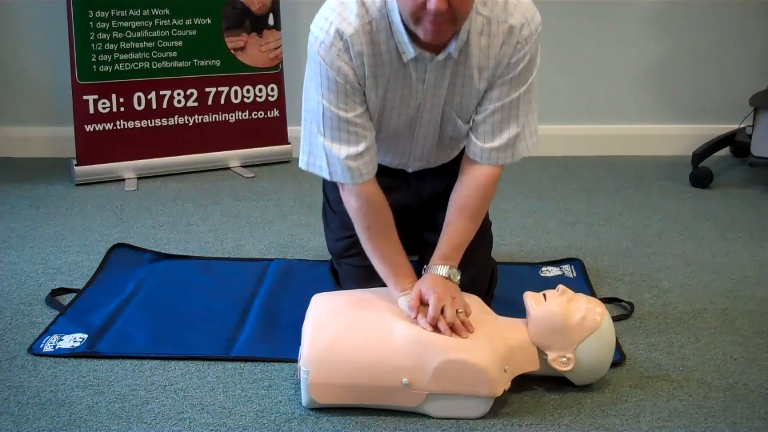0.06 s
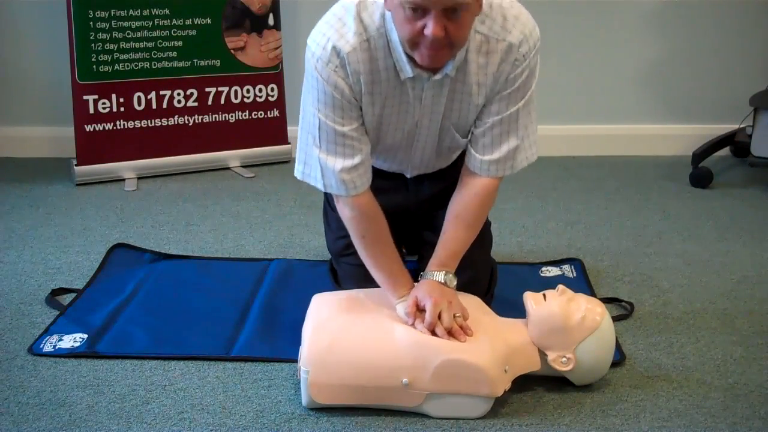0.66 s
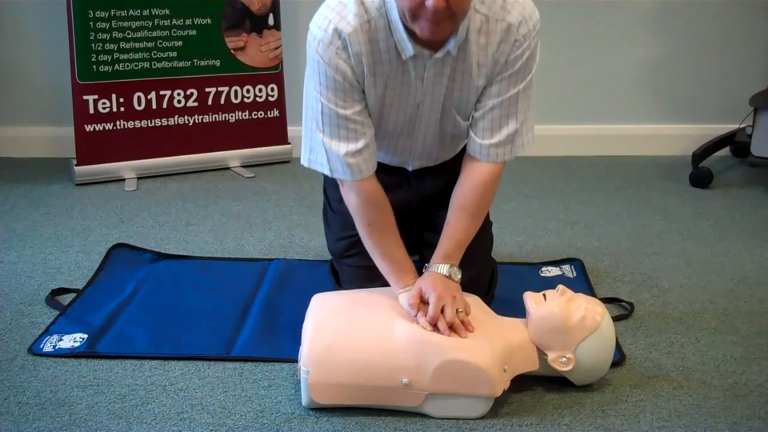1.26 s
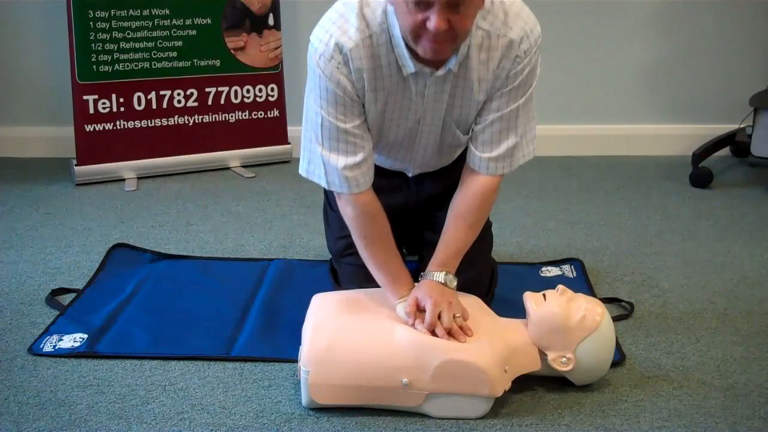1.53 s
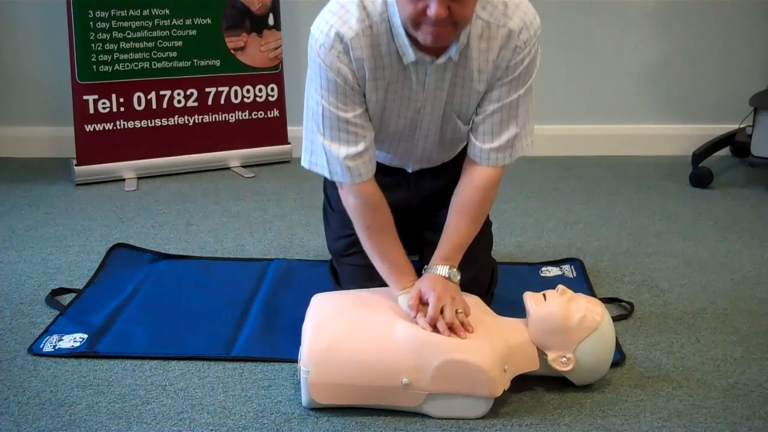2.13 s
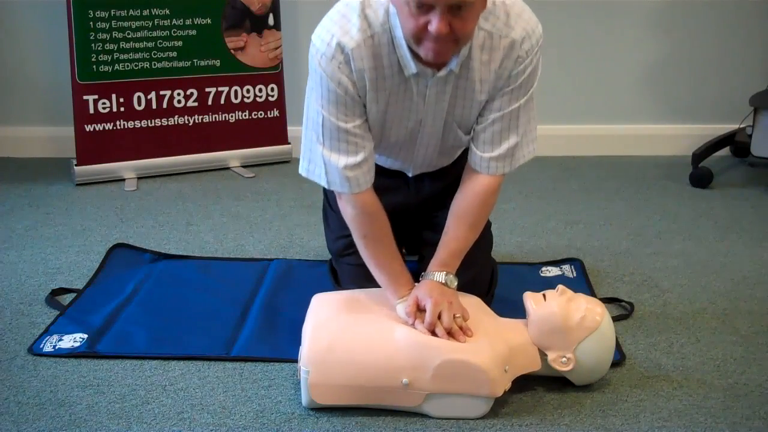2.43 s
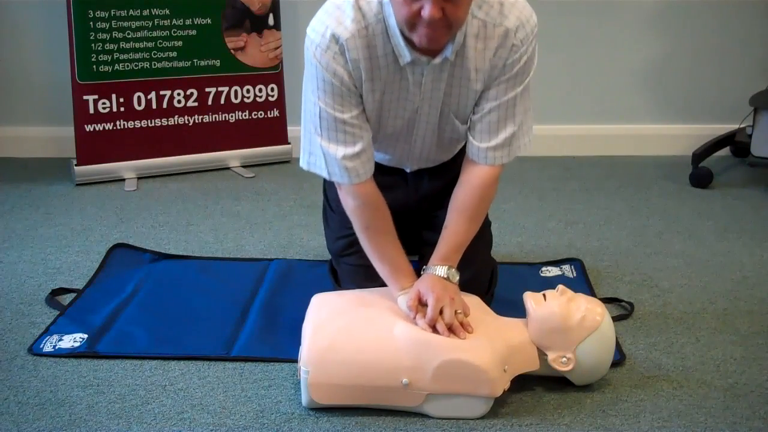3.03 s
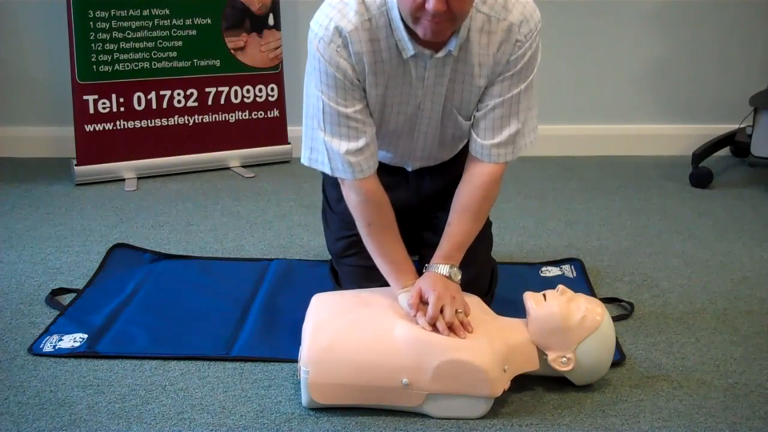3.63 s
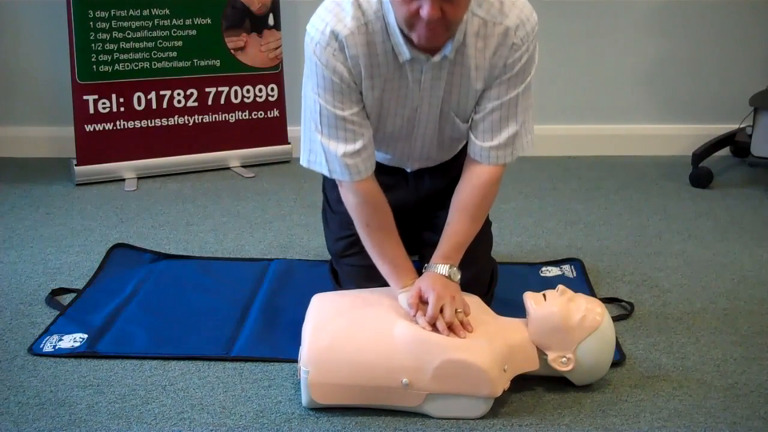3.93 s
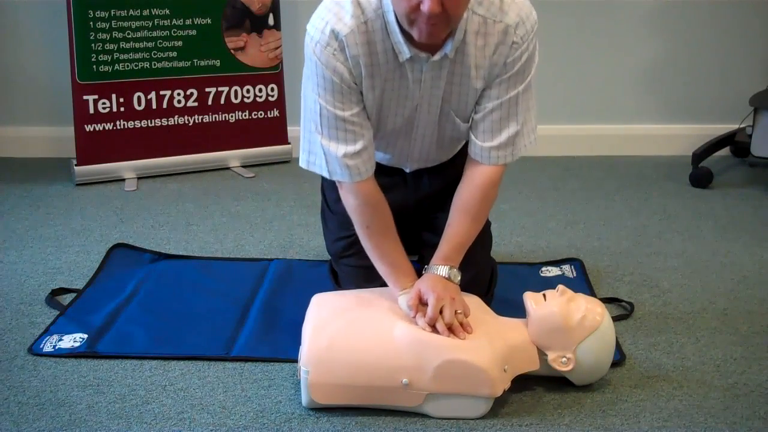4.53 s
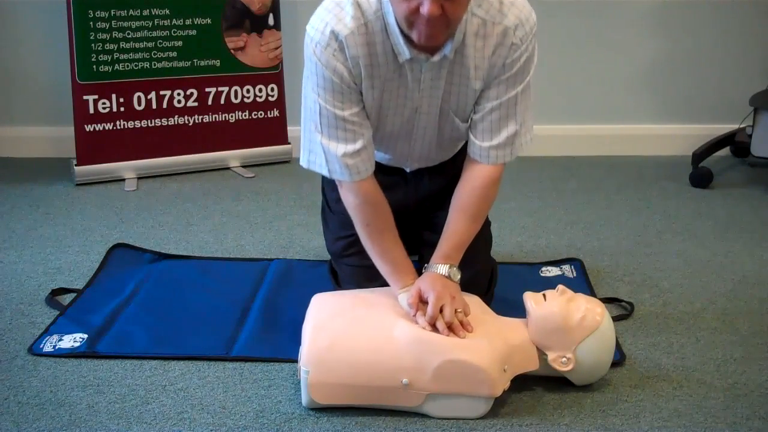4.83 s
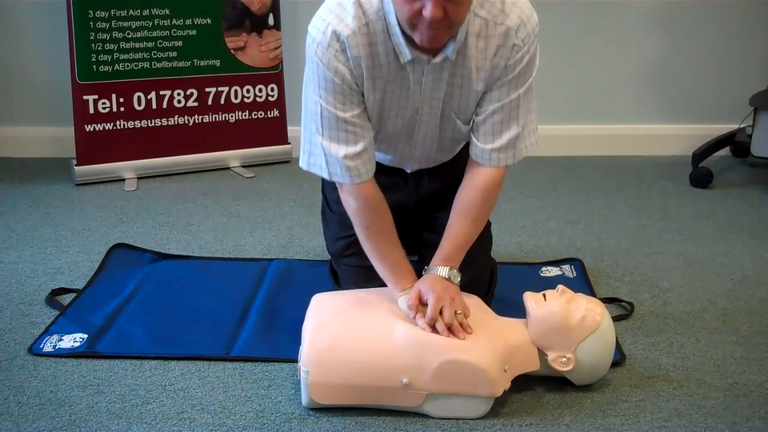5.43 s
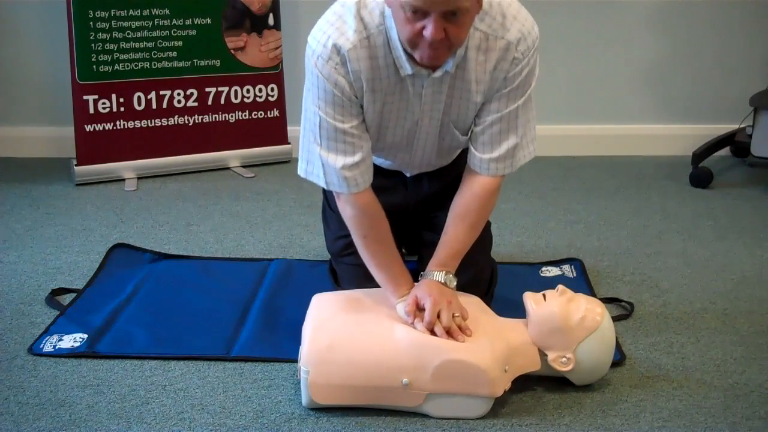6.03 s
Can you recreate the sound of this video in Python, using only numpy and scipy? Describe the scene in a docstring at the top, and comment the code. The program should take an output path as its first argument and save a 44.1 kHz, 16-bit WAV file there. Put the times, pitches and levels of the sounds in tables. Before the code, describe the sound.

A plastic training manikin is given chest compressions at a steady pace, a little over two a second. Each push makes a metal clicker inside snap, and each release snaps it back more brightly, so the clicks come in tight pairs. The hollow torso rings briefly with every snap. The microphone is nearby in a carpeted room with a short echo, faint hiss and a low hum.

```python
"""A steel clicker in a plastic training manikin, under chest compressions at about 135 a minute.
Each push makes it tick, then snap through; on release it snaps back, brighter.
The hollow torso rings with every snap and the carpeted room answers. Once, rubbing plastic squeaks faintly.
Behind it: quiet hiss, mains hum and a far, low drone that comes and goes."""
import sys
import numpy as np
from scipy import signal
from scipy.fft import rfft, irfft, next_fast_len
from scipy.io import wavfile
from scipy.ndimage import uniform_filter1d, map_coordinates

SR = 44100
rng = np.random.default_rng(int(sys.argv[2]) if len(sys.argv) > 2 else 0)


def bounce(signal):
    """Save signal as a 16-bit WAV file at the path given by the first command-line argument."""
    frames = np.transpose(np.atleast_2d(signal))
    limited = np.clip(frames, -1, 1)
    pcm = np.round(limited * 32767).astype(np.int16)
    wavfile.write(sys.argv[1], SR, pcm)


N = 276507

# Compressions. Each row: start of buckling, snap through, snap back, all in seconds.
PUSHES_S = [(-0.19, -0.16, -0.07), (0.2525, 0.2851, 0.3733), (0.7207, 0.7539, 0.8348),
            (1.1625, 1.193, 1.2784), (1.6195, 1.6506, 1.7382), (2.0746, 2.1036, 2.1837),
            (2.5227, 2.5511, 2.6405), (2.9775, 3.0056, 3.0863), (3.4295, 3.4594, 3.546),
            (3.8621, 3.8944, 3.9906), (4.3108, 4.3398, 4.439), (4.7702, 4.799, 4.8927),
            (5.2121, 5.2426, 5.3308), (5.6566, 5.6889, 5.7765), (6.0932, 6.1275, 6.2206)]
# Spectra of tick, snap through and snap back. Each row: frequency in Hz, relative level in dB.
TICK_SPECTRUM = [(130, -30), (230, 8), (380, -11.5), (700, -8.5), (1250, -16.5), (1750, -7), (2500, -16),
                 (3200, -11.5), (4100, -23.5), (5900, -14.5), (6800, -17.5), (7600, -1.5), (8600, -26),
                 (12000, -52)]
PRESS_SPECTRUM = [(60, -35.5), (130, -22), (185, -13), (400, -7), (650, -4), (1250, -1), (2200, -11.5),
                  (3100, -17.5), (4500, -20.5), (5100, -5), (6150, -7.5), (6700, -21.5), (7600, -33),
                  (9200, -53), (14000, -60)]
RELEASE_SPECTRUM = [(60, -31.5), (130, -25.5), (185, -4), (290, -3), (370, -11), (650, 1), (1500, -4.5),
                    (2100, -4), (2700, -11), (3900, -14.5), (6300, -7.5), (7700, -6.5), (9700, -22.5),
                    (14000, -31.5), (16400, -59)]
# Torso resonances. Each row: frequency in Hz, width in Hz, pressed and released lift in dB before scaling.
SHELL_MODES = [(193.6, 14.7, 11.5, 6.5), (239.5, 38, 7, 8), (475.6, 21, 4.5, 1.5), (545.7, 10, 10, 7.5),
               (590, 30, -1.5, 3.5), (623, 32.3, 12, 2.5), (682.5, 30, 8.5, -3), (744, 11.3, 10, -0.5),
               (816, 24, -4, 1.5), (921.3, 49, 8.5, 11), (997, 29, 5.5, 2), (1067, 20, 6.5, -6),
               (1145, 49, 4, 0), (1258, 17.3, 8.5, 7), (1293, 22, 3, 5), (1616, 35, 4.5, -5.5),
               (1790, 33, 9, -19), (1950, 130, -1.5, 5), (2314, 48, -6, 10), (3304, 170, 0, 10),
               (4396, 203, 9, 11.5)]
# Soft skin muffling the ring in the chest. Each row: frequency in Hz, gain in dB.
SKIN_GAIN = [(8000, 1), (13000, -6.5)]
# Left-right likeness of a snap. Each row: frequency in Hz, coherence from 0 to 1.
SNAP_COHERENCE = [(200, .985), (600, .97), (1100, .955), (2200, .9), (5000, .8), (8000, .55), (13000, .4)]
# Treble mismatch of the two microphone ports. Each row: frequency in Hz, left minus right in dB.
PORT_BALANCE = [(300, -.3), (3800, -.5), (5050, -1.8), (6150, -6), (6800, 0), (7600, 10.5), (10000, 10),
                (14000, 7)]
# Chest squeaks. Each row: start and length in seconds, pitch in Hz, glide in Hz per second,
# level in dB, octave level in dB.
CHEST_SQUEAKS = [(4.562, 0.14, 2680, -300, -77, -69), (4.68, 0.1, 2580, 2199, -71, -77)]
# Room feed: bass fills the room, treble is beamed. Each row: frequency in Hz, relative level in dB.
ROOM_FEED = [(205, 11), (690, 4), (1380, 3.5), (2950, -1.5), (7900, -14.5)]
# Room reverberation. Each row: frequency in Hz, T60 in seconds.
ROOM_T60 = [(205, 0.53), (510, 0.48), (1020, 0.31), (2550, 0.31), (6050, 0.82), (12200, 1)]
# Room hiss. Each row: frequency in Hz, relative level in dB.
HISS_SPECTRUM = [(15, -38), (25, -9.5), (87, -4.5), (147, -10), (425, -12.5), (722, -11.5), (781, -11),
                 (1330, -10.5), (1730, -16), (2140, -12.5), (3100, -15), (4480, -17), (14000, -21)]
# Left-right likeness of the hiss. Each row: frequency in Hz, coherence from 0 to 1.
HISS_COHERENCE = [(31, 0.14), (82, 0.69), (260, 0.48), (1050, 0.15), (4100, 0.049), (12500, 0.021)]
# Leftward lean of the hiss. Each row: frequency in Hz, left minus right in dB.
HISS_LEAN = [(55, 1.5), (310, 10.5), (820, 8), (2600, 5), (6100, 4), (12500, 2.5)]
# Swells of the far drone. Each row: start in seconds, length in seconds, level in dB.
DRONE_SWELLS = [(0.654, 0.68, -68), (2.25, 0.9, -72.5), (3.107, 1.28, -74)]

SNAP_SAMPLES = 2 ** 15
BINS_HZ = np.fft.rfftfreq(SNAP_SAMPLES, 1 / SR)


def clicker(tick_db=-13.5, press_db=0.04, release_db=1.3, speed_power=1.4):
    """The spring gives every push the same snaps; a faster push buckles it sooner and ticks louder."""
    _, _, pressed_db, released_db = np.transpose(SHELL_MODES)
    tick_s, press_s, release_s = np.transpose(PUSHES_S)
    speed = 1 / (press_s - tick_s)
    ticks_db = tick_db + speed_power * 20 * np.log10(speed / speed.mean())
    tick = cracks(crack_s=0.0033, cavity_t60_s=0.1, cavity_db=-5, steel_db=5, room_db=-8.5, fresh=0.37)
    press = cracks(crack_s=0.0048, cavity_t60_s=0.12, cavity_db=-4.5, steel_db=10, room_db=-13.5,
                   fresh=0.059)
    release = cracks(crack_s=0.0054, cavity_t60_s=0.15, cavity_db=-5, steel_db=4, room_db=-13, fresh=0.41)
    return (torso(tick, tick_s, ticks_db, TICK_SPECTRUM, 0.13 * pressed_db, bend_s=0.00498, bend_hz=300)
            + torso(press, press_s, press_db, PRESS_SPECTRUM, 1.55 * pressed_db,
                    bend_s=0.00598, bend_hz=279)
            + torso(release, release_s, release_db, RELEASE_SPECTRUM, 1.206 * released_db,
                    bend_s=0.01199, bend_hz=320))


def cracks(crack_s, cavity_t60_s, cavity_db, steel_db, room_db, fresh):
    """Spectra per push: a crack of a few ms, and its echoes in chest and room."""
    t = np.arange(SNAP_SAMPLES) / SR
    steel_share = along([(1500, 0), (4500, 1)], BINS_HZ)  # 0: shell knock, 1: steel ring
    crack = rfft(echo_paths(fresh) * np.exp(-(t / crack_s) ** 4))
    cavity = rfft(echo_paths(fresh) * amp(cavity_db - 60 * t / cavity_t60_s))
    cavity *= amp(steel_db * steel_share + along(SKIN_GAIN, BINS_HZ))
    room = rfft(room_tail(t, fresh)) * amp(room_db + along(ROOM_FEED, BINS_HZ))
    echoes = cavity + room
    # Flatten the sum: echoes add ripple, no colour.
    power = np.mean(abs(crack + echoes) ** 2, axis=(0, 1))
    fine, broad = uniform_filter1d(power, size=45), uniform_filter1d(power, size=220)
    flatten = causal(1 / np.sqrt(abs(fine + steel_share * (broad - fine))))
    return crack * flatten, echoes * flatten


def torso(spectra, times_s, energy_db, colour, lifts_db, bend_s, bend_hz, echo_share=0.5):
    """The shell rings at each snap. It beams its resonances, so echoes carry only a share of the lift."""
    crack, echoes = spectra
    shell_db = sum(db / (1 + (2 * (BINS_HZ - hz) / width_hz) ** 2)
                   for (hz, width_hz, *_), db in zip(SHELL_MODES, lifts_db))
    rung = crack * causal(amp(shell_db)) + echoes * causal(amp(echo_share * shell_db))
    body = causal(amp(along(colour, BINS_HZ)) * balance(PORT_BALANCE, BINS_HZ))
    # Low bending waves cross the shell slowly: each knock falls in pitch.
    lag_s = bend_s / (1 + (BINS_HZ / bend_hz) ** 2)
    bending = np.exp(-2j * np.pi * np.cumsum(lag_s) * SR / SNAP_SAMPLES)
    fade = np.minimum(np.linspace(2, 0, SNAP_SAMPLES), 1)
    snaps = irfft(rung * body * bending) * fade
    out = np.zeros((2, N + 2 * SR))
    for at_s, db, snap in zip(times_s, energy_db * np.ones(len(times_s)), snaps):
        start = round(at_s * SR) + SR
        out[:, start:start + SNAP_SAMPLES] += amp(db) * unit(snap) / np.sqrt(SNAP_SAMPLES)
    return out[:, SR:SR + N]


def echo_paths(fresh):
    """Dense echoes as noise. Nothing moves far, so only a part, weighted by fresh, changes per push."""
    shared = rng.standard_normal((2, SNAP_SAMPLES))
    per_push = rng.standard_normal((len(PUSHES_S), 2, SNAP_SAMPLES))
    return unit(stereo(shared + fresh * per_push, SNAP_COHERENCE))


def squeaks(waver_hz=12.5):
    """Plastic rubs on plastic between two pushes: a thin gliding tone and its octave."""
    t = np.arange(N) / SR
    out = np.zeros(N)
    for start_s, length_s, hz, glide_hz_per_s, db, octave_db in CHEST_SQUEAKS:
        pitch_hz = hz + glide_hz_per_s * (t - start_s) + waver_hz * wobble(knots_per_s=90)
        partials = amp(db) * tone(pitch_hz) + amp(octave_db) * tone(2 * pitch_hz)
        out += swell(start_s, length_s, fade_s=0.031) * partials
    return out


def room_tail(t, fresh, onset_s=0.0088):
    """The walls answer after some ms; each band decays at its own rate."""
    hz, age_s, bands = signal.stft(echo_paths(fresh), SR, nperseg=256)
    bands *= amp(-60 * age_s / along(ROOM_T60, hz)[:, None])
    _, tail = signal.istft(bands, SR, nperseg=256)
    return tail[..., :SNAP_SAMPLES] * (1 - np.exp(-(t / onset_s) ** 2))


def room_tone(hiss_db=-60.5, hiss_top_hz=14100, drone_hz=74.4, waver_hz=1.01, mains_db=-79.5):
    """Steady hiss, a far drone in swells and a trace of mains hum."""
    noise = stereo(rng.standard_normal((2, N)), HISS_COHERENCE)
    hiss = filtered(noise, lambda hz: amp(along(HISS_SPECTRUM, hz)) * balance(HISS_LEAN, hz)
                    * (hz < hiss_top_hz))
    swells = sum(amp(db) * swell(start_s, length_s, fade_s=0.27) for start_s, length_s, db in DRONE_SWELLS)
    drone = swells * tone(drone_hz + waver_hz * wobble(knots_per_s=2.97))
    return amp(hiss_db) * unit(hiss) + drone + amp(mains_db) * tone(hz=100)


def amp(db):
    """Decibels to gain."""
    return 10 ** (np.asarray(db) / 20)


def unit(x):
    """Scale to rms 1."""
    return x / np.sqrt(np.mean(x ** 2) + 1e-20)


def along(points, hz):
    """Interpolate (Hz, value) points on a log axis."""
    knots_hz, values = np.transpose(points)
    return np.interp(np.log(hz + 1), np.log(knots_hz + 1), values)


def filtered(x, response):
    """Apply a response given as a function of Hz."""
    n = x.shape[-1]
    padded = next_fast_len(n + 2 ** 12)
    return irfft(rfft(x, padded) * response(np.fft.rfftfreq(padded, 1 / SR)), padded)[..., :n]


def causal(gain):
    """Minimum-phase response: rings only after the blow."""
    cepstrum = irfft(np.log(np.maximum(gain, 1e-7)))
    cepstrum[..., 1:SNAP_SAMPLES // 2] *= 2
    cepstrum[..., SNAP_SAMPLES // 2 + 1:] = 0
    return np.exp(rfft(cepstrum))


def balance(points, hz):
    """Left and right gains for a level difference."""
    return amp(np.outer([.5, -.5], along(points, hz)))


def stereo(noise, coherence):
    """Mix two unrelated noises to left and right; coherence sets mid against side."""
    angle = lambda hz: np.arccos(np.clip(along(coherence, hz), -1, 1)) / 2
    mid_side = filtered(noise, lambda hz: np.array([np.cos(angle(hz)), np.sin(angle(hz))]))
    return np.array([[1, 0.97], [1, -1.57]]) @ mid_side


def wobble(knots_per_s):
    """Smooth random curve."""
    knots = rng.standard_normal(int(N * knots_per_s / SR) + 4)
    return map_coordinates(knots, [np.arange(N) * knots_per_s / SR])


def swell(start_s, length_s, fade_s):
    """Fade in, hold, fade out."""
    t = np.arange(N) / SR - start_s
    return np.clip(np.minimum(t, length_s - t) / fade_s, 0, 1)


def tone(hz):
    """Sine of rms 1 following a pitch."""
    return np.sqrt(2) * np.sin(2 * np.pi * np.cumsum(hz * np.ones(N)) / SR)


def scene(left_lag_s=2.6e-5):
    """Manikin over room tone. It lies a little to the right, so the left channel lags."""
    delay = lambda hz: np.exp(-2j * np.pi * np.outer([.5, -.5], hz) * left_lag_s)
    return filtered(clicker() + squeaks(), delay) + room_tone()


def record(dry, top_hz=16400):
    """Brick-wall low-pass."""
    return filtered(dry, lambda hz: hz < top_hz)


dry = scene()
out = record(dry)
bounce(out)
```